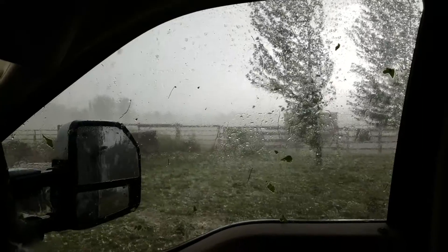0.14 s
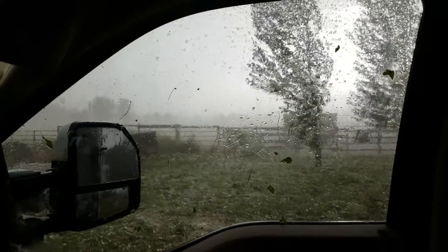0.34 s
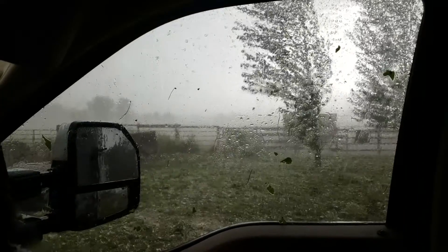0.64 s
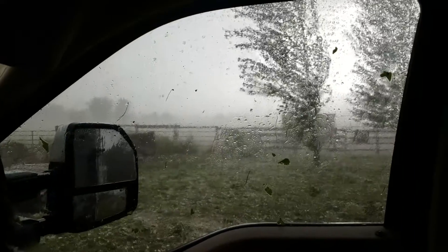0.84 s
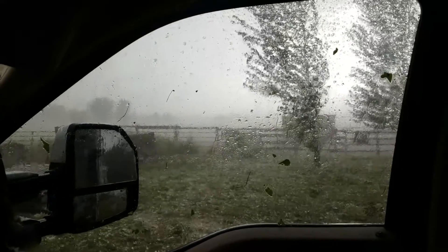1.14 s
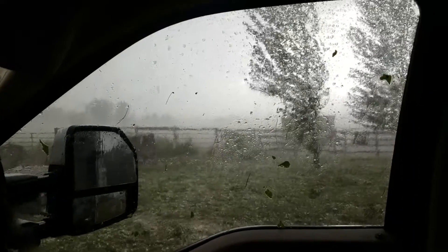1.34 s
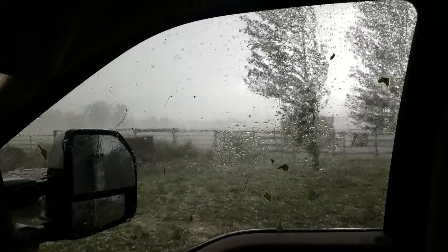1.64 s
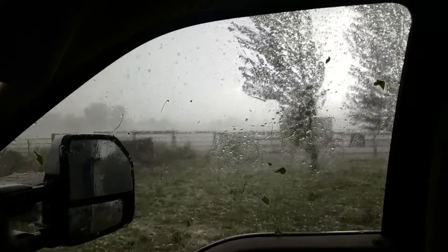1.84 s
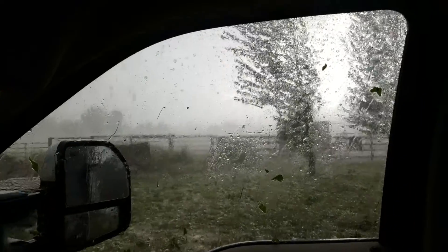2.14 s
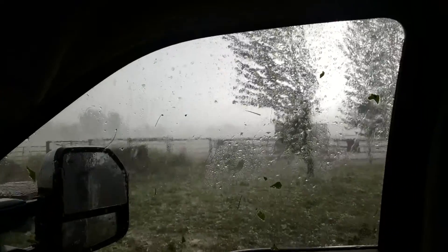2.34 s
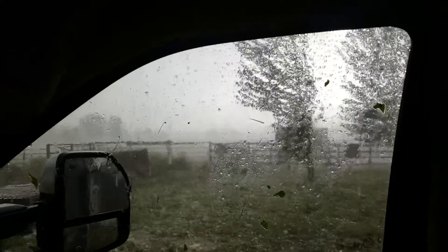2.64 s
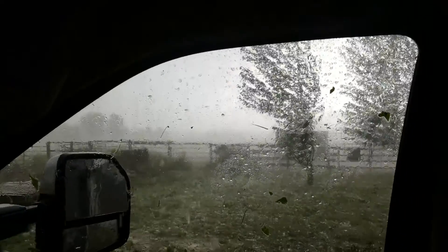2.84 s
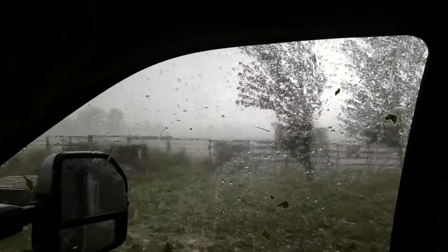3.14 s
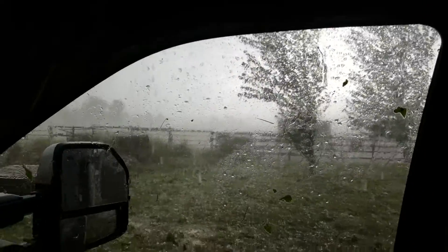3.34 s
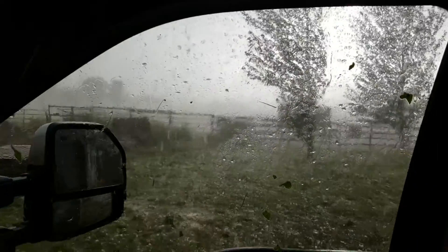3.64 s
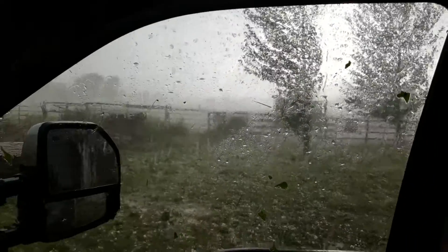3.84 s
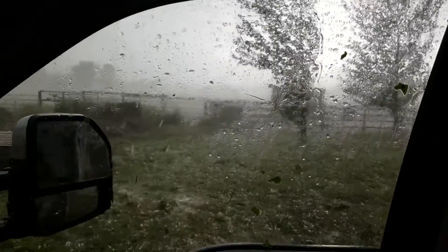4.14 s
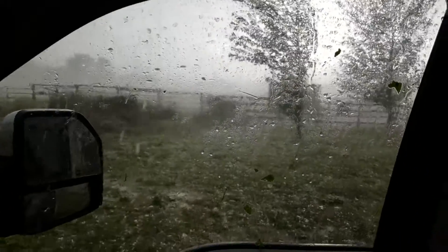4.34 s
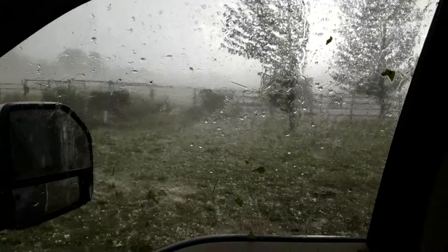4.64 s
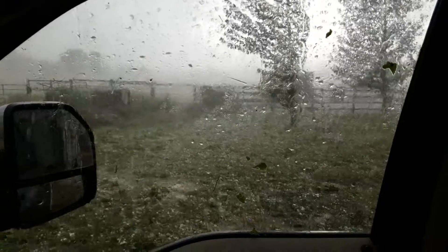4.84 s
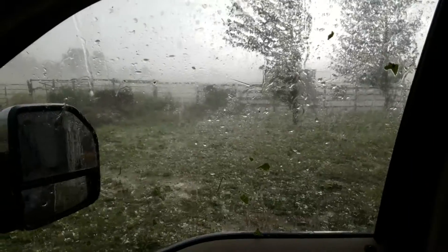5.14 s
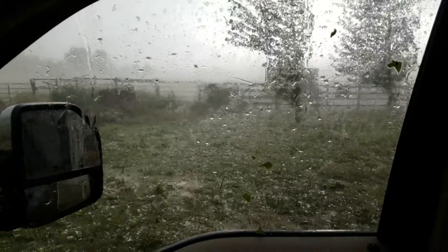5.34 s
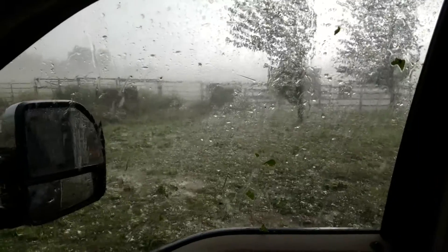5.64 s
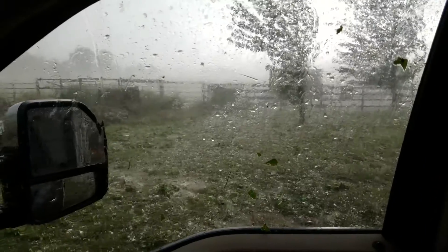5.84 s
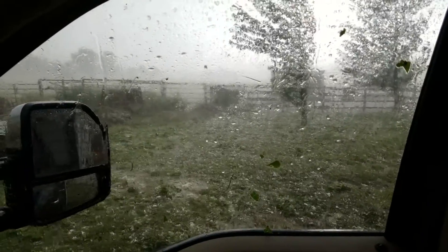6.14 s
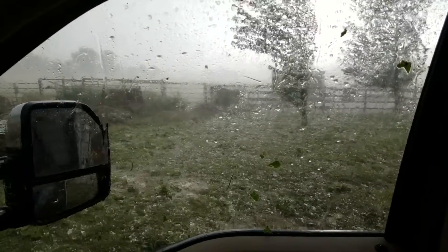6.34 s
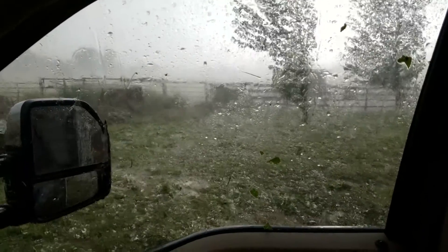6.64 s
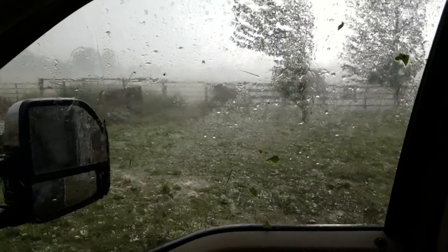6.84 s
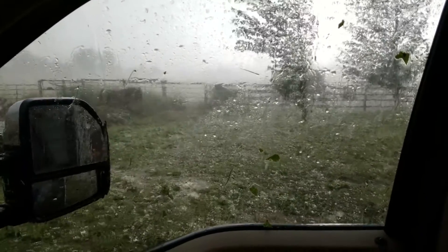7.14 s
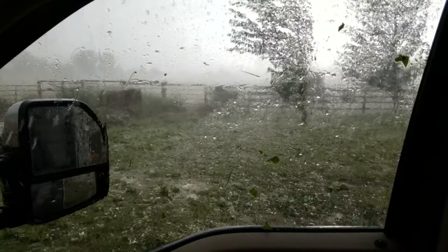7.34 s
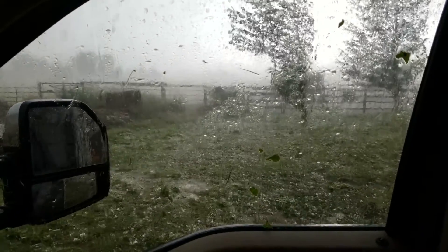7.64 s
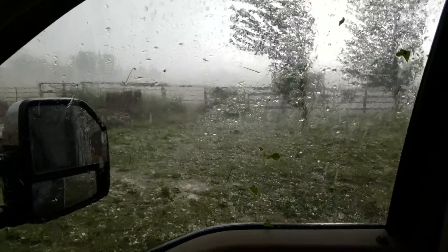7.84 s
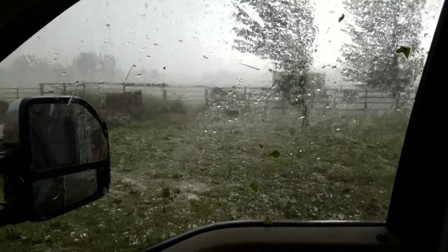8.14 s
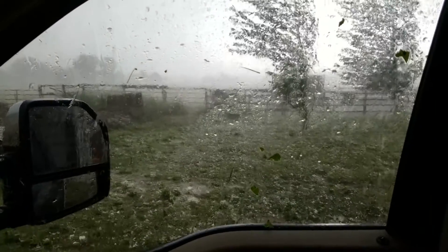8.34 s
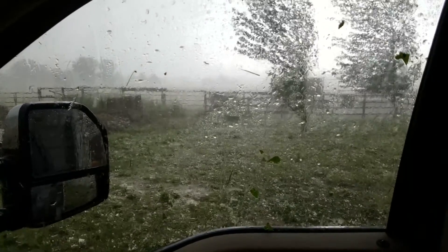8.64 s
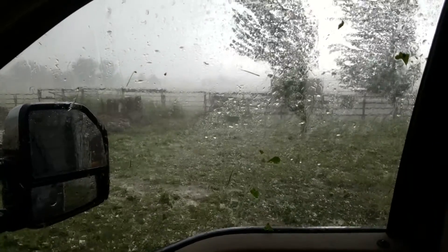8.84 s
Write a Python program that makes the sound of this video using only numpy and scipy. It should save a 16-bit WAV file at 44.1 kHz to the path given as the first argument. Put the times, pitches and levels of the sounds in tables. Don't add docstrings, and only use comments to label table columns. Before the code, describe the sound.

Inside a parked truck, irregular hail knocks on steel and snaps on glass over faint rain, dense at first, sparse and nearly quiet by the end.

```python
import sys
import numpy as np
from scipy import signal
from scipy.fft import rfft, irfft
from scipy.io import wavfile
from scipy.ndimage import uniform_filter1d

SR = 44100
rng = np.random.default_rng(int(sys.argv[2]) if len(sys.argv) > 2 else 0)


def to_linear_factor(level_db):
    exponent = np.asarray(level_db, float) / 20
    return 10 ** exponent


def dump(signal):
    limited = np.clip(np.atleast_2d(signal).T, -1, 1)
    pcm = np.round(limited * 32767).astype(np.int16)
    wavfile.write(sys.argv[1], SR, pcm)


N = 396459

# frequency [Hz], gain [dB]
PORT_RESPONSE = [(30, -13), (90, -0.5), (5500, -7), (6600, -4), (7400, 5), (8100, 10.5), (8900, 5),
                 (10000, 0.5), (12000, -4), (15600, -4.5), (16000, -25.5)]


def read(points, hz):
    f, value = np.transpose(points)
    return np.interp(np.log(hz + 1), np.log(f + 1), value)


def evened(x):
    return x / np.sqrt(np.mean(x ** 2) + 1e-20)


def add(mix, start_s, sound):
    part = mix[round(start_s * SR):][:len(sound)]
    part += sound[:len(part)]


def struck(source, events):
    layer = np.zeros(N)
    for start_s, *settings in events:
        add(layer, start_s, source(*settings))
    return layer


def blow(t, rise_ms, t60_ms, bend):
    rise_s = max(rise_ms, 0.2) / 1000
    after_s = np.maximum(t - rise_s, 0)
    third_s = abs(t60_ms) / 3000
    return np.minimum(t / rise_s, 1) ** 1.1 * to_linear_factor(-20 * (after_s / third_s) ** bend)


def ringing(t, hz, share_db, fade_db):
    detune, luck, turn = rng.standard_normal((3, len(hz), 1))
    share = to_linear_factor(share_db + 3 * luck)
    phase = 0.22 * turn
    waves = np.sin(2 * np.pi * (hz * (1 + 0.02 * detune) * t + phase))
    return (share * to_linear_factor(-fade_db * t) * waves).sum(0) / np.sqrt((share ** 2).sum() / 2)


def wash(colour, patchy_db, flicker_db, size):
    frames, hz = 4 * N // size + 5, np.fft.rfftfreq(size, 1 / SR)
    a, b, patches = rng.standard_normal((frames, len(hz), 3)).T
    patches = evened(uniform_filter1d(uniform_filter1d(patches, 10, 0), 12, 1))
    flicker = evened(uniform_filter1d(rng.standard_normal(frames), 8))
    level_db = read(colour, hz)[:, None] + patchy_db * patches + flicker_db * flicker
    z = (a + 1j * b) * to_linear_factor(level_db)
    return evened(signal.istft(z, nperseg=size, noverlap=3 * size // 4)[1][:N])


def hiss():
    # frequency [Hz], level [dB]
    residue = [(400, -23), (900, 0.5), (3000, -1.5), (6000, -9), (8000, -15), (16000, -5)]
    return to_linear_factor(-69.5) * wash(residue, patchy_db=0.7, flicker_db=0.3, size=512)


def rain():
    # start_s [s], level_db [dB]
    gusts = [(0, -64.5), (0.4, -65.5), (1.45, -69), (1.9, -75), (2.349, -65), (2.75, -68.5), (3.1, -60),
             (3.5, -80), (5.199, -83), (6.05, -79.5), (6.6, -122.5), (7.9, -67.5), (8.151, -83),
             (8.5, -63.5), (8.751, -76), (8.99, -82)]
    # frequency [Hz], level [dB]
    patter_colour = [(1500, -15.5), (4000, -13), (7000, 4.5), (16000, -6.5)]
    drops_per_s = 120
    hit = rng.random(N + 2) < drops_per_s / SR
    drops = hit * to_linear_factor(13.5 + 3.0 * np.minimum(rng.exponential(1, N + 2), 3))
    patter = wash(patter_colour, patchy_db=4.5, flicker_db=3.5, size=256) + np.diff(drops, 2)
    start_s, level_db = np.transpose(gusts)
    return to_linear_factor(np.interp(np.arange(N) / SR, start_s, level_db) - 6.5) * patter


def drumming():
    # frequency [Hz], level [dB]
    body_colour = [(20, -17.5), (60, -4.5), (115, 0.5), (220, -2), (500, -8.5), (1000, -17.5), (2000, -33)]
    rest_db, db_per_blow, memory_s = -69.5, 5, 0.058
    t = np.arange(N) / SR
    coarse = t[::64]
    crowd = sum(np.exp(-((coarse - row[0]) / memory_s) ** 2 / 2) for row in thuds())
    level_db = np.interp(t, coarse, rest_db + db_per_blow * crowd)
    return to_linear_factor(level_db) * wash(body_colour, patchy_db=3.3, flicker_db=2.4, size=1024)


def rustle(db, hz, octaves=0.25, rise_ms=7, t60_ms=70):
    t, f = np.arange(8192) / SR, np.fft.rfftfreq(8192, 1 / SR)
    grit = to_linear_factor(3.5 * np.minimum(rng.exponential(1, 8192), 4)) * rng.standard_normal(8192)
    band = np.exp(-(np.log2((f + 1) / hz) / octaves) ** 2 / 2)
    puff = irfft(rfft(grit) * band)
    slow = 1 + 250 / hz
    return to_linear_factor(db) * evened(puff) * blow(t, rise_ms * slow, t60_ms * slow, 1.7)


def rustles():
    # start_s [s], level_db [dB], pitch_hz [Hz]
    rough_puffs = [(0.0, -62.5, 2160), (0.113, -61, 2500), (0.113, -60, 900), (0.233, -44, 101),
                   (0.305, -45, 756), (0.51, -52, 4300), (0.63, -40, 2140), (0.61, -41, 850), (0.68, -35, 517),
                   (0.729, -56, 1300), (0.778, -53, 390), (0.815, -59.5, 900), (0.903, -34, 660),
                   (0.925, -35, 398), (0.962, -58, 2160), (0.97, -47, 620), (1.084, -55, 3040),
                   (1.195, -44, 770), (1.247, -62, 8300), (1.322, -51, 1530), (1.391, -58, 100),
                   (2.027, -35.5, 1500), (2.512, -56.5, 100), (2.72, -64.5, 796), (2.751, -63.5, 280),
                   (2.754, -65.5, 100.4), (2.77, -66.5, 2200), (2.948, -57, 390), (4.105, -56, 1500),
                   (4.167, -54, 140), (4.186, -66, 6040), (4.308, -43.5, 770), (4.385, -60, 1400),
                   (4.402, -65, 2504), (4.55, -54.5, 1492), (4.847, -59.5, 1090), (5.372, -64, 2600),
                   (5.4, -58, 450), (5.807, -65.5, 4290), (5.879, -75, 8520), (5.917, -51, 100),
                   (7.175, -56, 280), (7.23, -56, 890), (7.499, -58, 390), (7.76, -68, 550), (8.297, -59, 800),
                   (8.384, -54.5, 560), (8.5, -65, 201), (8.736, -67, 200), (8.95, -68.5, 200)]
    return struck(rustle, rough_puffs)


def splinter(db):
    return rustle(db, 8000, rise_ms=1, t60_ms=58)


def splinters():
    # start_s [s], level_db [dB]
    skips = [
        (0.5095, -57),
        (0.588, -57),
        (0.637, -55),
        (1.005, -64),
        (4.2, -63),
        (7.853, -69),
    ]
    return struck(splinter, skips)


def tick(db):
    spray = to_linear_factor(-11.5 - 60 * np.arange(1500) / SR / 0.025) * rng.standard_normal(1500)
    return to_linear_factor(db - 2.0) * np.diff(np.r_[0, 1, spray])


def ticks():
    # start_s [s], peak_db [dB]
    hard_drops = [(0.3672, -50), (1.4913, -46), (1.6337, -29), (1.8308, -48.5), (0.4448, -38.5),
                  (2.2853, -50), (2.2988, -54), (2.3676, -44), (2.375, -56), (2.6128, -44), (0.8665, -49.5),
                  (3.2033, -46), (3.2114, -37), (3.234, -38), (3.4829, -40.5), (3.5228, -48),
                  (3.5437, -44.5), (3.5943, -45), (3.883, -46), (0.8975, -38), (7.3702, -46),
                  (7.4076, -55.5), (7.4916, -47.5), (7.9082, -50.5), (8.246, -56.5), (8.4356, -53.5),
                  (8.488, -57.5), (8.5132, -49.5), (8.562, -56), (8.595, -49)]
    return struck(tick, hard_drops)


def ping(db, hz, rise_ms=1.6, t60_ms=70, spread=0.032):
    t = np.arange(5000) / SR
    detune, turn = rng.standard_normal((2, 3, 1))
    bunch = np.sin(2 * np.pi * (hz * (1 + spread * detune) * t + turn)).sum(0)
    return to_linear_factor(db) * bunch * blow(t, rise_ms, t60_ms, 1.45)


def pings():
    # start_s [s], level_db [dB], pitch_hz [Hz]
    singing = [(0.184, -40, 4000), (0.256, -37.5, 4900), (1.043, -35.5, 3610), (1.633, -41.5, 2440),
               (2.0524, -29.5, 4130), (2.941, -34.5, 2960), (4.355, -45, 2860), (4.4488, -36, 2050),
               (4.824, -36, 4100), (5.0073, -39, 2036), (6.39, -42.5, 4400), (6.96, -64.5, 483),
               (7.485, -62.5, 975)]
    return struck(ping, singing)


def boom(db, hz, rise_ms, t60_ms, bend=2.4, sag=0.26, rough=0.3):
    t = np.arange(6000) / SR
    span = int(5 * SR / hz)
    window = np.hanning(span + span // 2)[None]
    a, b = signal.fftconvolve(rng.standard_normal((2, 6000)), window, "same")
    waver = 1 + rough * min(hz / 400, 1.5) * (evened(a) + 1j * evened(b))
    ring = waver * np.exp(2j * np.pi * (hz * t * (1 - sag * t) + rng.random()))
    return to_linear_factor(db) * ring.real * blow(t, rise_ms, t60_ms, bend)


def knock(db, hz, rise_ms=5.0, t60_ms=50):
    return boom(db - 2.5, hz, rise_ms, t60_ms * (1000 / hz) ** 0.3, bend=1.6, rough=0.55)


def knocks():
    # start_s [s], level_db [dB], pitch_hz [Hz]
    small_panels = [(0.114, -55, 556), (0.18, -25.5, 4414), (0.177, -43, 2590), (0.177, -37, 2393),
                    (0.219, -42, 1520), (0.248, -35.5, 532), (0.282, -39.5, 575), (0.32, -36, 2750),
                    (0.322, -43, 1790), (0.427, -36, 2026), (0.494, -39, 344), (0.607, -38.5, 2550),
                    (0.609, -28, 1719), (0.674, -31.5, 2260), (0.754, -36, 337), (0.756, -50, 4300),
                    (0.779, -30, 2490), (0.843, -34.5, 2854), (1.004, -53, 2040), (1.037, -39, 2970),
                    (1.039, -42, 430), (1.117, -34, 2760), (1.117, -31.5, 840), (1.247, -38.5, 559),
                    (1.343, -43, 1816), (1.367, -49, 4160), (1.655, -35, 742), (1.737, -47.5, 340),
                    (2.024, -28, 1910), (2.027, -25.5, 4090), (2.171, -33.5, 765), (2.182, -33.5, 344),
                    (2.524, -46.5, 3930), (2.715, -60, 344), (2.786, -66, 898), (2.958, -31, 800),
                    (3.009, -55, 2270), (3.141, -49, 344), (3.23, -55, 2605), (3.319, -47, 5140),
                    (3.323, -38.5, 857), (3.323, -34, 3020), (3.519, -64, 2583), (3.782, -39.5, 1900),
                    (3.791, -38, 644), (4.224, -46, 2010), (4.364, -37, 343), (4.511, -45, 2180),
                    (4.821, -37, 3970), (4.89, -55, 452), (5.002, -38, 2046), (5.329, -56.5, 387),
                    (5.421, -52.5, 1660), (5.67, -45, 4690), (5.67, -47, 344), (5.899, -46, 430),
                    (5.933, -49.5, 918), (6.439, -37, 427), (7.183, -53, 5383), (7.52, -44, 344)]
    return struck(knock, small_panels)


def thud(db, rise_ms, t60_ms, centre_hz, upper_db):
    roof_modes = [71.8, 101, 127, 142, 174, 200.3, 231, 262, 294.5, 324, 367, 396.7]
    door_modes = [456.6, 519, 560.5, 562.8, 639, 688, 765, 824, 924, 1176]
    t = np.arange(min(15000, round((rise_ms + t60_ms) * SR / 1000))) / SR
    low, high = np.array(roof_modes)[:, None], np.array(door_modes)[:, None]
    heavy_db = max(db + 22.5, 0)
    share_db = -(13.5 + 0.41 * heavy_db) * abs(np.log2(low / centre_hz)) ** 0.61
    fade_db = (129.0 + 15 * heavy_db) * (low / centre_hz - 1).clip(-0.1)
    roof = ringing(t - rise_ms / 1400, low, share_db, fade_db)
    doors = ringing(t, high, -5.0 * np.log2(high / 450), 0.38 * high)
    late = np.maximum(t - t60_ms / 4300, 0)
    shut_db = heavy_db * (0.7 * np.minimum(late / 0.008, 1) + 16 * late)
    return to_linear_factor(db - shut_db) * (roof + to_linear_factor(upper_db) * doors) * blow(t, rise_ms, t60_ms, 0.86)


def thuds():
    # start_s [s], level_db [dB], rise_ms [ms], t60_ms [ms], centre_hz of the low modes [Hz]
    mid_roof = [(0.43, -31, 15.6, 95, 365), (0.484, -34.5, 14.8, 310, 236), (0.6015, -27, 11.2, 400, 242),
                (0.902, -20, 10.2, 430, 202), (1.066, -42, 1.06, 160, 175), (1.1598, -40.5, 2.8, 69, 261.6),
                (1.701, -46.5, 9.3, 250, 158), (1.865, -55.5, 39, 190, 165), (2.211, -42.5, 4.8, 230, 262),
                (2.5753, -46, 41, 66, 118), (3.027, -45.5, 8, 160, 216), (3.087, -51, 11, 62, 197),
                (3.4362, -47.5, 3.5, 130, 142), (5.9787, -43, 13.8, 150, 226),
                (6.1543, -45.5, 24, 170, 201), (6.47, -35, 0.83, 130, 152), (7.097, -55.5, 31, 180, 186.3),
                (7.517, -40, 28, 115, 192)]
    roof_edge = [(2.0195, -40.5, 11.3, 240, 300), (2.114, -43, 7.5, 220, 336), (2.887, -42, 53, 38, 220),
                 (2.9623, -34, 27.7, 255, 231), (3.143, -43, 25.4, 82, 181), (3.23, -56.5, 4.6, 140, 230),
                 (3.3226, -38, 18.4, 63, 264), (3.411, -43, 11.3, 45, 159.5), (3.7898, -42, 18.5, 300, 215),
                 (4.216, -42.5, 32.6, 1200, 187), (4.338, -35, 0.76, 370, 200),
                 (4.4446, -35.5, 19.3, 156, 258.3), (4.52, -47, 42, 95, 158), (5.365, -53, 13.5, 140, 262),
                 (5.671, -47, 29, 270, 239), (5.8149, -57, 9.8, 740, 194), (6.207, -41.5, 24, 100, 232),
                 (6.4368, -38.5, 7.8, 254, 223), (7.1864, -44, 57, 123, 300), (7.678, -46, 29, 150, 182)]
    # start_s [s], level_db [dB], rise_ms [ms], t60_ms [ms]
    sides = [(0.0063, -56, 2.6, 210), (0.146, -48, 45, 310), (0.2383, -45, 12.7, 480),
             (0.333, -43.5, 9.7, 220), (0.8413, -46, 5.5, 800), (1.117, -37.5, 9.6, 114),
             (1.195, -41, 6.8, 35), (1.232, -51, 26, 130), (1.3413, -45, 9.7, 260),
             (1.6315, -45.5, 4.9, 100), (1.6644, -47, 3.3, 87), (2.167, -40.5, 18, 92),
             (2.5161, -48, 12, 200), (3.7337, -53, 9.9, 310), (3.9207, -54, 41, 160),
             (4.117, -44, 10.8, 380), (4.2761, -40, 8.9, 410), (4.804, -68.5, 17, 430),
             (5.0039, -43.5, 7.4, 105), (5.902, -45.5, 65, 81), (6.3747, -50.5, 12.3, 300),
             (6.955, -72.5, 17, 210), (8.297, -57, 18.4, 390), (8.378, -62.5, 13.4, 570)]
    blows = [(s, db, *rest, -0.5 + 0.2 * db) for s, db, *rest in mid_roof]
    blows += [(*row, -0.5) for row in roof_edge]
    blows += [(*row, 300, 7.5) for row in sides]
    return sorted(blows)


def booms():
    # start_s [s], level_db [dB], pitch_hz [Hz], rise_ms [ms], t60_ms [ms]
    woken = [(0.601, -16, 232, 5.5, 210), (0.618, -16.5, 292, 5.1, 77), (0.606, -22.5, 147.6, 5.8, 220),
             (0.607, -26, 745, 8.9, 120), (0.596, -33, 565, 44, 150), (0.638, -25.5, 372, 11, 250),
             (0.655, -25.5, 196.5, 16, 240), (0.672, -32, 860, 6.5, 26), (0.7, -25.5, 250, 18, 150),
             (0.64, -30, 845, 8.7, 50), (0.62, -33, 92, 30, 200), (0.898, -10.5, 292, 11, 85),
             (0.91, -16.5, 178, 17, 330), (0.915, -16.5, 218, 12, 130), (0.903, -17.5, 510, 12, 70),
             (0.905, -23.5, 570, 14, 190), (0.898, -28, 730, 7.2, 77), (0.898, -35, 870, 7, 42),
             (0.93, -31, 440, 10, 100), (0.878, -38.5, 380, 12, 40), (1, -40, 630, 10, 150)]
    # start_s [s], drop_db [dB]
    clamps = [
        (0.721, 9.7),
        (0.977, 14),
    ]
    clamp_s, held_s = 0.0034, 0.12
    t = np.arange(N) / SR
    drop_db = sum(db * np.clip((t - s) / clamp_s, 0, 1) * (t < s + held_s) for s, db in clamps)
    return struck(boom, woken) * to_linear_factor(-drop_db)


def snap(db, hz=8050, rise_ms=0.55, t60_ms=3.6):
    t = np.arange(600) / SR
    return to_linear_factor(db - 17) * np.sin(2 * np.pi * hz * t) * blow(t, rise_ms, t60_ms, 1.0)


def snaps():
    # start_s [s], level_db [dB]
    near_chips = [
        (0.7601, -19),
        (0.7843, -12),
        (1.6336, -5),
        (2.5192, -17),
        (4.8148, -5),
        (5.77, 1.5),
        (5.7735, -2),
    ]
    return struck(snap, near_chips)


def crack(db, rise_ms, t60_ms, knock_db, ice_db, size=12288):
    t, hz = np.arange(size) / SR, np.fft.rfftfreq(size, 1 / SR)
    colour = [(120, knock_db - 44), (400, knock_db - 9.0), (800, knock_db + 1.5), (1400, knock_db + 1.5),
              (1900, 0.00012), (4500, 0.013), (6000, ice_db / 2 - 4), (7500, ice_db - 9.5),
              (16000, ice_db - 19.0)]
    bumps = np.interp(np.log(hz + 1), np.linspace(5.5, 9.8, num=44), rng.standard_normal(44))
    spot_db = 3.6 * bumps / (1 + (hz / 6000) ** 2)
    shape = to_linear_factor(read(colour, hz) + spot_db)
    heard = np.sqrt(np.mean((shape * to_linear_factor(read(PORT_RESPONSE, hz)) * (hz > 1500)) ** 2))
    clumps = to_linear_factor(2.4 * evened(uniform_filter1d(rng.standard_normal(size), 40)))
    echoes = rfft(evened(clumps * rng.standard_normal(size))) * shape / heard
    low, top = 1 / (1 + (hz / 1300) ** 4), 1 / (1 + (5500 / (hz + 1)) ** 4)
    hold_bend = 1.4
    woody = irfft(echoes * low) * blow(t, rise_ms, 1.54 * t60_ms, 2.6)
    body = irfft(echoes * (1 - low - top)) * blow(t, rise_ms, t60_ms, hold_bend)
    fizz = irfft(echoes * top) * blow(t, rise_ms, 0.8 * t60_ms, hold_bend)
    return to_linear_factor(db - 1.0) * (body + woody + fizz)


def cracks():
    # start_s [s], level_db [dB], t60_ms [ms], splinter_db against the body [dB]
    chips = [(1.3229, -49.5, 110, 13), (1.4491, -49.5, 76, 18), (1.565, -51.5, 67, 14),
             (1.735, -53, 68, 11), (1.7565, -58, 160, 11), (2.61, -71, 240, 16), (3.1156, -49.5, 65, 15),
             (3.374, -56, 83, 11), (3.4847, -63, 110, 19), (3.5616, -54.5, 59, 11.5),
             (3.597, -67.5, 148, 17), (4.002, -66.5, 170, 18), (4.7333, -43, 79, 24.5),
             (4.8149, -21, 70, 7.5), (4.987, -53.5, 65, 11), (5.2718, -51, 63, 15.5),
             (5.3109, -59.5, 91, 10.5), (5.422, -56.5, 78, 14), (5.543, -56, 92, 11.5),
             (5.592, -59.5, 115, 28), (5.603, -70.5, 65, 16), (5.768, -27, 64, 13.5),
             (5.825, -48, 45, 12.5), (5.9, -45, 65, 8.5), (7.3675, -63, 210, 35), (8.236, -62, 115, 18),
             (8.3647, -55, 180, 11)]
    # start_s [s], level_db [dB], t60_ms [ms], knock_db against the body [dB]
    sharp = [(0.1783, -30.5, 71, -6.5), (0.758, -37, 57, 1), (0.783, -28, 61, -13.5),
             (1.0398, -33.5, 71, -4), (1.6336, -26, 71, -7), (1.6601, -40, 105, -11),
             (2.025, -20, 60, -11.5), (2.077, -49, 107, -14), (2.117, -43, 81, 3), (2.519, -33.5, 84, -9.5),
             (2.8674, -59.5, 350, -3.5), (3.0094, -51.5, 185, -12), (3.1573, -47, 96, -8),
             (3.404, -50, 130, -1), (3.7318, -48, 125, -4.5), (3.787, -41, 81, -7.5), (4.111, -49, 150, 1),
             (4.2704, -47, 107, -3), (4.4429, -40.5, 127, 2), (5.0373, -54.5, 71, -16.5),
             (5.671, -51, 146, 2)]
    dull = [(0.2797, -37, 81, -17), (0.4285, -40, 101, 0.5), (0.6005, -46.5, 187, 14.5),
            (0.6697, -33, 88, 2.5), (0.8422, -45.5, 133, 3.5), (0.9, -37.5, 113, 4.5),
            (1.0017, -62.5, 140, 7), (1.1125, -44.5, 102, 0), (1.1944, -46, 103, 2),
            (1.343, -44.5, 120, -0.5), (2.051, -36, 53, -31), (2.1737, -42, 94, -7.5),
            (2.959, -37.5, 104, -12), (3.142, -48, 38, 2.5), (3.3218, -31.5, 75, -10),
            (4.217, -51.5, 120, 4), (4.2495, -60, 63, 1), (4.309, -51, 113, -1), (4.349, -42.5, 79, 0),
            (4.4825, -46, 79, -10), (5.005, -37, 64, -3.5), (7.521, -60.5, 120, 6)]
    # start_s [s], level_db [dB], rise_ms [ms], t60_ms [ms], knock_db [dB]
    slush = [(0.1427, -40, 5.2, 116, 2), (0.2187, -51, 8.9, 98, -1), (0.2427, -38, 9.3, 140, -5.5),
             (0.319, -45.5, 12.4, 108, 0), (0.486, -52.5, 14, 200, -2), (1.238, -51.5, 11, 133, 2),
             (2.225, -52, 14, 65, 1), (2.9, -48.5, 15, 94, -9), (2.9322, -34.5, 6.4, 105, -6.5),
             (3.803, -47, 3.6, 190, -7.5), (4.512, -54.5, 24, 183, 0), (5.363, -62.5, 5, 94, 12.5),
             (5.9242, -44.5, 6.5, 112, 2.5), (6.1478, -49, 3.5, 176, -13.5), (6.2075, -42.5, 3.7, 100, -8),
             (6.374, -35.5, 7, 122, -9.5), (7.175, -53, 6.9, 253, -2.5), (7.6719, -54, 6.3, 145, 1.5),
             (8.2954, -60, 5.5, 140, 2)]
    stones = [(s, db, 6 * (db / -50) ** 2, t60, -32.5 - 0.55 * db, ice) for s, db, t60, ice in chips]
    stones += [(s, db, 4.7, t60, knock_db, 0.66) for s, db, t60, knock_db in sharp]
    stones += [(s, db, 3, t60, knock_db, -8 - max(knock_db, 0) / 2) for s, db, t60, knock_db in dull]
    stones += [(*row, 1.8) for row in slush]
    return struck(crack, sorted(stones))


def scene():
    storm = hiss() + rain() + drumming()
    light = rustles() + splinters() + ticks() + pings() + knocks()
    heavy = struck(thud, thuds()) + booms()
    ice = snaps() + cracks()
    return (storm + light + heavy + ice)[None]


def band_limit(x):
    return signal.sosfilt(signal.butter(12, 16530, fs=SR, output="sos"), x)


def record(dry):
    log_gain = np.log(to_linear_factor(read(PORT_RESPONSE, abs(np.fft.fftfreq(8192, 1 / SR)))))
    port = np.fft.ifft(np.exp(np.conj(signal.hilbert(log_gain)))).real[:4096]
    offset = -0.0004
    mix = signal.oaconvolve(dry, port[None])[:, :N] + offset
    return band_limit(mix)


dry = scene()
out = record(dry)
dump(out)
```